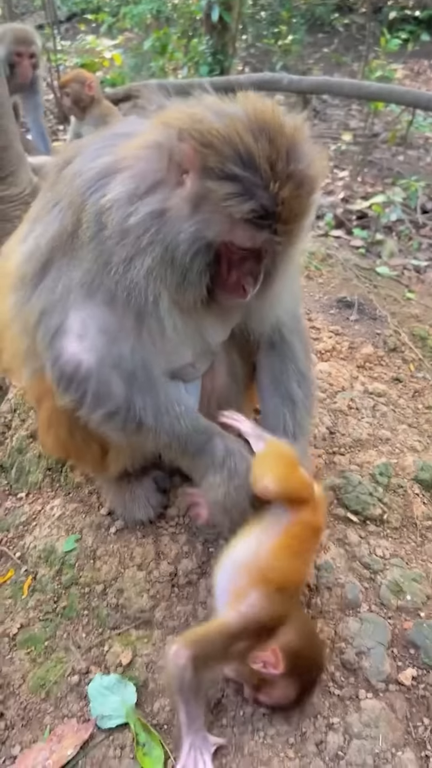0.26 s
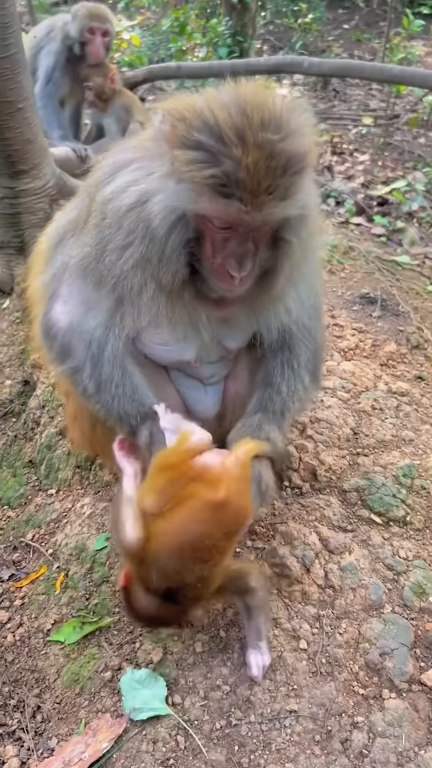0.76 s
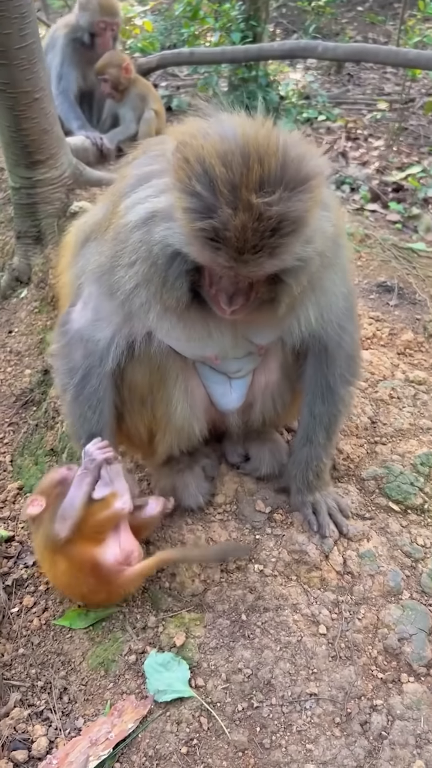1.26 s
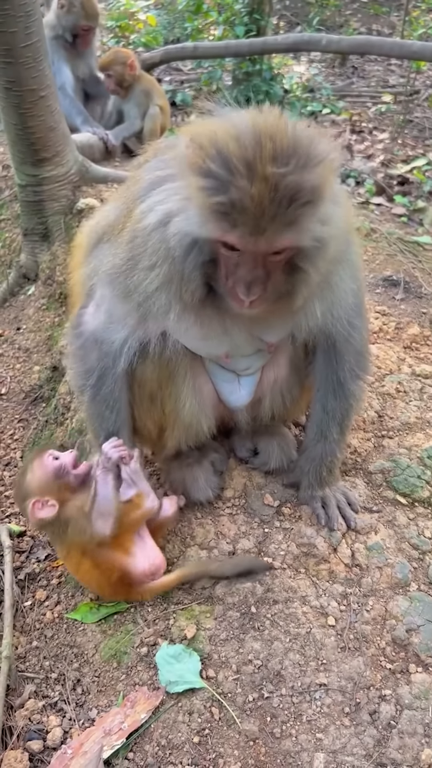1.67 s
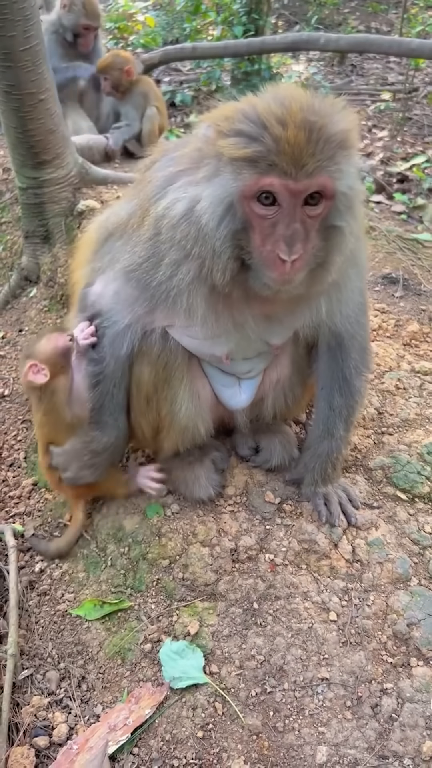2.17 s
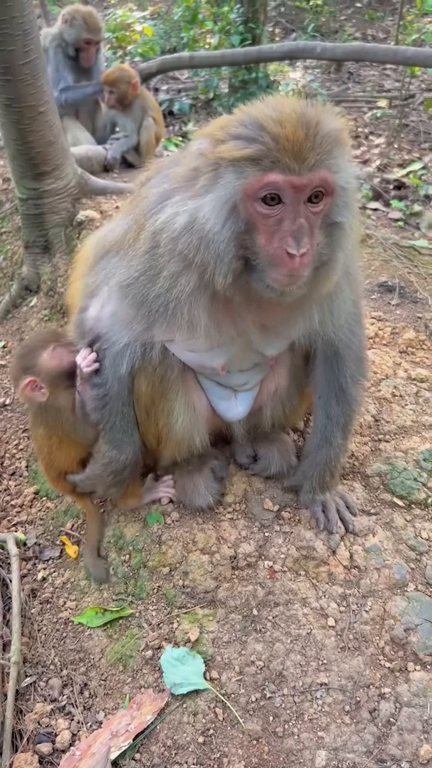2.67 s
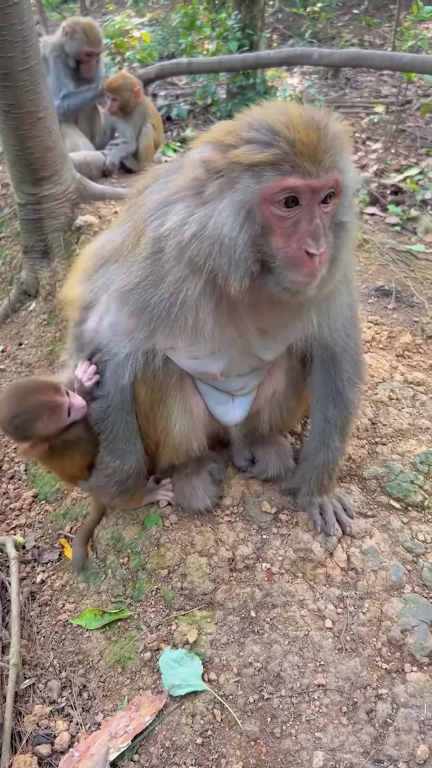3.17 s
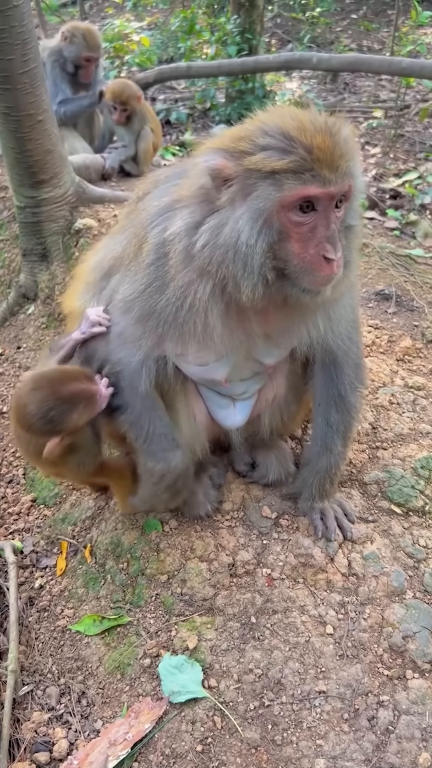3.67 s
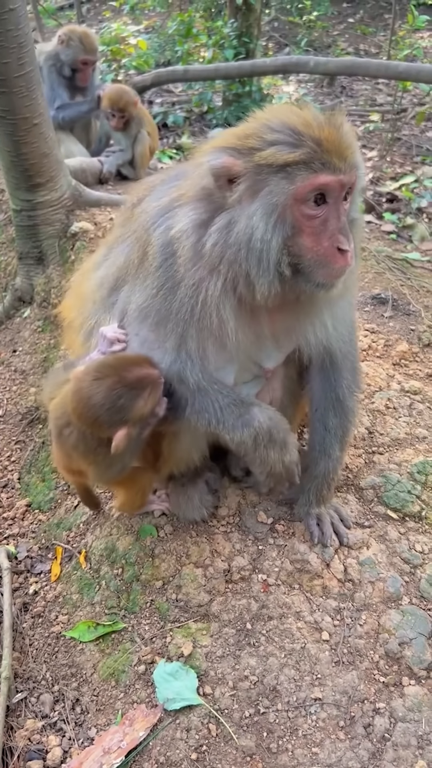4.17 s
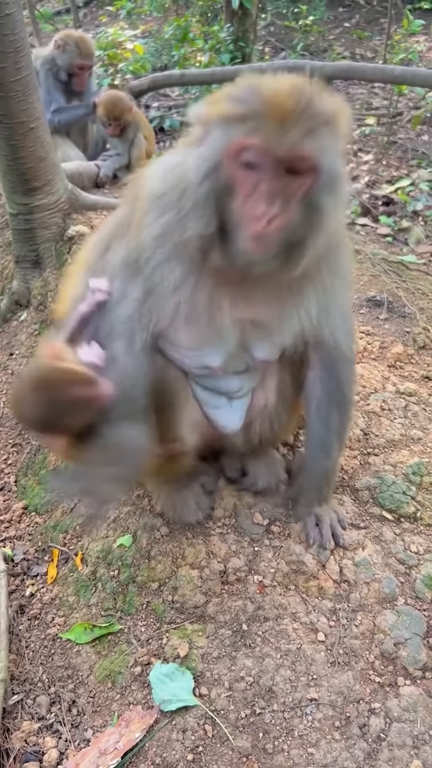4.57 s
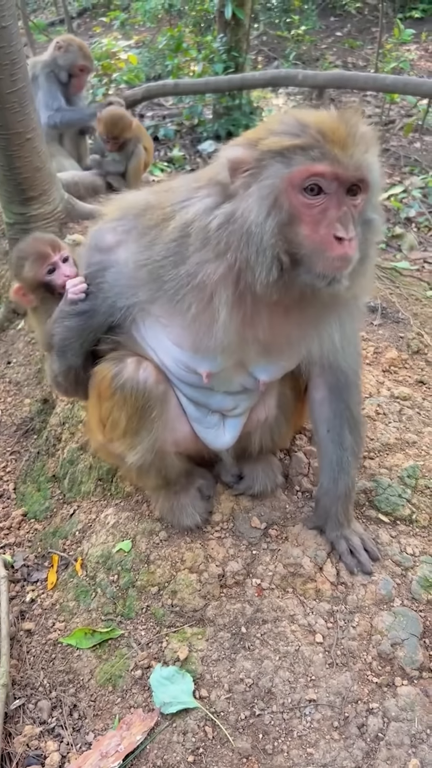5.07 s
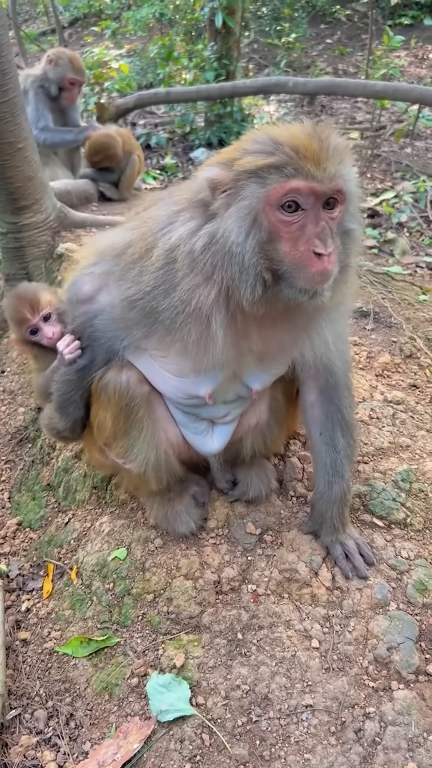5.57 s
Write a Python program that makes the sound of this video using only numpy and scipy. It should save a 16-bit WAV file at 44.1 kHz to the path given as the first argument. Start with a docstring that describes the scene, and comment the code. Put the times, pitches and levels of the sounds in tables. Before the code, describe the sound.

Close outdoor pickup of an infant monkey under trees. A thin wavering scream opens, overlapped by an older monkey's gruff, rapid chatter to one side. About eight short, harsh squeals follow until two seconds, mostly ending in a tiny low grunt. Then it is much quieter: small grunts, lip smacks, fur rustle, a few whimpers and one falling squeak over low rumble and soft woodland wash.

```python
"""A long, wavering scream opens the scene, soon joined by the gruff chatter of an older monkey off to one side.
A baby macaque, tumbled about by its mother on bare ground under trees, then gives a run of short squeals:
a whistle of the vocal folds, a break of the voice into rougher tones, and mostly a tiny low grunt of pulses.
Once it clings to her, resonant grunts, whimpers, lip smacks, fur rustle and one squeak remain over filtered-noise
rumble and wash, with a far chirr and faint high notes; ground and wood answer with decaying-noise echoes."""
import sys
import numpy as np
from scipy import signal
from scipy.fft import rfft, irfft, next_fast_len
from scipy.io import wavfile
from scipy.ndimage import uniform_filter1d

SR = 44100
rng = np.random.default_rng(int(sys.argv[2]) if len(sys.argv) > 2 else 0)


def wav_record(signal):
    """Record a signal, one row per channel, as 16-bit PCM in the file named by sys.argv[1]."""
    frames = np.transpose(np.atleast_2d(signal))
    bounded = np.clip(frames, -1, 1)
    # unit amplitude maps onto the largest positive 16-bit level
    quanta = np.round(bounded * 32767).astype(np.int16)
    wavfile.write(sys.argv[1], SR, quanta)


N = 256662
TIME = np.arange(N) / SR   # s

# In the column lists, "rel." marks a level that a further gain or balance acts on.
# spectrum of the distant rumble: f/Hz, rel. level/dB
RUMBLE = [(15, -48), (24, -35.5), (33, -18.5), (45, -1), (70, 3), (86, 2), (109, -2), (167, -3.5),
          (260, -8.5), (350, -22), (600, -32.5), (1200, -120)]
# course of the rumble: t/s, rel. level/dB
RUMBLE_LEVEL = [(0.0, -68), (0.44, -63.5), (0.63, -68), (1.69, -68), (1.78, -67), (3.24, -62.5),
                (3.42, -64), (4.03, -73.5), (4.25, -63), (4.54, -61.5), (4.7, -62), (5.24, -60),
                (5.72, -60.5), (5.82, -62)]
# spectrum of the wash of the wood: f/Hz, rel. level/dB
WASH = [(150, -24.5), (250, -8), (570, -9), (850, -10.5), (1300, -13.5), (2900, -23), (4500, -24),
        (6900, -28.5), (9500, -38.5), (12000, -48), (15600, -69)]
# course of the wash: t/s, rel. level/dB
WASH_LEVEL = [(0.0, -70), (0.42, -69.5), (0.61, -73), (1.1, -76), (3.18, -71), (3.4, -72.5), (4.0, -75.5),
              (4.73, -71), (5.14, -73.5), (5.82, -72.5)]
# left-right likeness of diffuse sound: f/Hz, correlation/1
LIKENESS = [(40, 0.95), (120, 1), (250, 0.68), (500, 0.41), (1000, 0.31), (8000, 0.26)]
# colour of the echo from the trees: f/Hz, rel. level/dB
WOOD_COLOUR = [(200, 20), (600, 0.5), (1400, -10), (3000, -6.5), (5000, 1.5), (8000, 0.5), (11000, -10.5),
               (16000, -4)]
# faint, blurred high notes: a lingering one after the last squeak, then a short bird-like chirp:
# t/s, length/s, f/Hz, level/dB
FAINT_NOTES = [(4.889, 0.14, 4620, -81), (5.504, 0.032, 4560, -79)]
# a far, shrill chirr among the trees: it swells, holds while its pitch sinks, and fades
CHIRR_START_S, CHIRR_HOLD_S, CHIRR_ATTACK_S, CHIRR_RELEASE_S = 4.17, 0.45, 0.089, 0.14
CHIRR_DB, CHIRR_HZ, CHIRR_SAG_HZ_PER_S = -66, 3900, 1000
# spectrum of fur friction: f/Hz, rel. level/dB
RUSTLE_COLOUR = [(400, -9), (950, 0), (1600, -4), (3000, -4.5), (5500, -3), (8500, 0), (11500, -9.5),
                 (15500, -18)]
# fur rubbing on fur as the infant shifts its grip: t/s, length/s, rel. level/dB
RUBS = [(1.82, 0.073, -67), (2.402, 0.052, -71), (2.817, 0.35, -64.5), (3.15, 0.33, -75.5),
        (3.626, 1, -79.5), (4.417, 0.54, -73.5)]
RUB_ATTACK_S, RUB_RELEASE_S, FUR_REST_DB = 0.067, 0.08, -96
# chatter of the older monkey: t/s, length/s before the release, rel. level/dB
CHATTER = [(0.145, 0.014, -44), (0.166, 0.0091, -50.5), (0.258, 0.032, -60), (0.295, 0.013, -49.5),
           (0.321, 0.0072, -43.5), (0.33, 0.013, -57), (0.359, 0.0095, -48), (0.3806, 0.0077, -43),
           (0.395, .012, -55.5), (0.439, 0.0066, -63), (0.45, 0.0045, -65.5)]
CHATTER_RELEASE_S = 0.0068   # each burst takes this much longer to die
# its throat resonances: rel. f/Hz, width/Hz, rel. level/dB
BIG_THROAT = [(330, 240, -2), (545, 100, 7), (860, 220, 3.5), (1132, 140, 11), (1334, 120, -1),
              (2870, 600, -10.5)]
# phase lead of the left microphone port for the older monkey: f/Hz, phase/rad
ASIDE_PHASE = [(100, -2.5), (350, -2.5), (1100, -2), (3000, -2.5)]
# level excess of the left port for it: f/Hz, level/dB
ASIDE_BALANCE = [(500, -1.5), (850, 1), (1150, 5), (1600, -0.5), (2800, -0.5)]
# soft scuffs, low thumps and a flick of fur: t/s, level/dB, centre f/Hz
SCUFFS_AND_THUMPS = [(0.293, -73, 7230), (0.463, -59, 230), (0.475, -69.5, 6060), (0.611, -67, 1300),
                     (0.618, -59.5, 267), (1.79, -63.5, 7000), (1.845, -60.5, 9000), (2.478, -69, 1840),
                     (2.836, -53, 8650), (3.048, -62, 10100), (3.475, -70.5, 897), (4.429, -61, 1746),
                     (4.751, -71, 5460), (4.782, -67, 890), (4.862, -68, 1198)]
# lip smacks: t/s, rel. level/dB, mouth resonance f/Hz, rel. treble level/dB
SMACKS = [(2.207, -62.5, 1320, 8.5), (2.3636, -42.5, 1580, -19), (2.52, -51.5, 1400, -25),
          (2.607, -48.5, 1510, -14), (2.616, -42, 1520, -6.5), (3.0717, -47, 1600, -34),
          (3.3332, -42.5, 1524, 2.5), (3.5754, -54, 1560, -30), (3.7435, -53.5, 1554, -38.5),
          (3.7539, -53.5, 1490, -14.5), (3.823, -48.5, 1520, -23), (4.448, -48, 1790, -10),
          (4.828, -67, 1500, -3), (5.4104, -43, 1556, -16.5)]
# modes of the small mouth: multiple of its resonance/1, rel. level/dB, t60/s
MOUTH = [(1, -2, 0.024), (1.45, -3, 0.005), (1.999, -18, 0.011), (2.85, -6, 0.0012)]
# spectrum of the tick of parting lips: f/Hz, rel. level/dB
TICK = [(250, -31.5), (800, 0.5), (2000, 0), (4500, 6), (7000, 13), (10000, 2), (15000, -26)]
# phase lead of the left port for the infant: f/Hz, phase/rad
PORT_PHASE = [(60, 0), (4740, -0.41), (5430, -1.1), (14900, -1.4), (16000, 0.2)]
# level excess of the left port for the infant: f/Hz, level/dB
PORT_BALANCE = [(60, -3.5), (240, -3.5), (950, -1.5), (3770, 0.5), (15000, 0)]
# low grunts: t/s, length/s, initial f/Hz, rel. voiced level/dB, mouth resonance f/Hz,
# rel. resonance level/dB, rel. rasp level/dB
GRUNTS = [ (0.555, 0.019, 871, -53.5, 2720, -45, -48.5), (0.829, .027, 604, -48, 2920, -50.5, -58.5),
          (1.041, 0.02, 794, -55.5, 2840, -59.5, -64.5), (1.253, 0.034, 920, -49.5, 3270, -51, -57),
          (1.487, 0.031, 663, -50.5, 2530, -53, -58), (1.703, 0.012, 716, -53.5, 2900, -48, -48),
          (1.801, 0.014, 601, -56, 2200, -67.5, -65), (2.022, 0.025, 522, -56, 2300, -65.5, -59),
          (2.218, 0.029, 481, -54.5, 1350, -64.5, -56.5), (2.432, 0.02, 426, -62.5, 1576, -60, -66),
          (2.649, 0.031, 453.5, -59.5, 1404, -62, -62), (2.9245, 0.026, 438, -53, 1320, -52.5, -61.5),
          (3.132, 0.021, 470, -53.5, 1390, -51, -56.5), (3.641, 0.011, 490, -61, 2850, -69, -71.5),
          (3.902, 0.021, 481, -70.5, 1200, -59, -74), (4.472, 0.023, 529, -58.5, 1790, -60, -54.5),
          (4.878, 0.012, 490, -60, 1334, -67.5, -67.5), ]
GRUNT_ATTACK_S, REST_HZ, RELAX_S = 0.00061, 385, 0.02   # the pitch sags towards that of slack folds
OPEN_ATTACK_S, CLINGS_S = 0.029, 2.1   # until the infant clings, its open-mouthed grunts swell more slowly
# rasp of an open-mouthed grunt: f/Hz, rel. level/dB
RASP = [(1500, -6), (3000, -10), (4700, -10.5), (6400, 1.5), (8500, -12), (12000, -14.5), (16000, -21.5)]
# thin hiss of a grunt or whimper with the mouth nearly shut: f/Hz, rel. level/dB
HISS = [(1500, -9.5), (3000, -10), (4700, -10), (6400, 3), (8500, -8.5), (12000, -13), (16000, -22)]
HISS_RISE_S, HISS_OUTLASTS_S = 0.0089, 0.018   # the hiss outlasts a grunt only
# thin, higher whimpers: t/s, initial f/Hz, mouth resonance f/Hz, resonance level/dB, hiss level/dB
WHIMPERS = [(4.107, 1060, 2080, -63.5, -74), (4.179, 1080, 2024, -67, -63.5),
            (4.653, 1123, 2260, -59.5, -59), (5.109, 1015, 944, -58.5, -55.5)]
WHIMPER_S, WHIMPER_ATTACK_S, WHIMPER_SAG_HZ, WHIMPER_LOW_DB = 0.042, 0.005, 180, -94
WHIMPER_Q = 5   # sharpness of the mouth resonance
# the opening scream: t/s, f/Hz, then rel. level/dB of the fundamental, the second harmonic and
# the half-harmonic between them, roughness/1
SCREAM = [(0.0, 6480, -35.5, -48, -51, 0.2), (0.008, 5610, -39.5, -33.5, -55.5, 0.1),
          (0.014, 5620, -35, -27, -55, 0.04), (0.021, 5730, -42.5, -33.5, -48.5, 0.04),
          (0.029, 6050, -41, -41.5, -49, .08), (0.038, 6510, -32.5, -52.5, -43, .03),
          (0.048, 6750, -40, -43.5, -41.5, 0.02), (0.075, 6950, -41.5, -49, -42, 0.03),
          (0.09, 6980, -43, -46.5, -53.5, 0.1), (0.113, 6770, -42.5, -46.5, -65.5, 0.04),
          (0.127, 6590, -38, -47, -60.5, 0.025), (0.139, 6800, -38, -45.5, -60, 0.04),
          (0.153, 6850, -44, -44, -41.5, .13), (0.165, 7200, -44, -44, -53, .16),
          (0.174, 7460, -40.5, -46.5, -55, .12), (0.184, 7000, -44, -37, -46.5, .06),
          (0.2, 6900, -41, -47, -64, 0.025), (0.213, 6580, -40, -53, -66.5, 0.015),
          (0.227, 6730, -36.5, -49, -63.5, 0.02), (0.239, 6580, -35.5, -52, -52.5, 0.1)]
SCREAM_GAIN_DB = 0.5
# whistles that open the squeals: t/s, roughness at onset/1, length/s, f/Hz, glide/octaves, rel. level/dB,
# second harmonic re the first/dB, roughness/1
WHISTLES = [ (0.314, 1, 0.019, 6450, 0.043, -35.5, -0.5, 0.58),
            (0.5324, 0.1, 0.0108, 8940, -.2, -21.5, -28, 0.04),
            (0.7984, 0.7, 0.011, 8080, -0.14, -33.5, -14, 0),
            (1.0095, 0.07, 0.0032, 6520, -0.055, -31.5, -20.5, 0.11),
            (1.2131, 0.5, 0.018, 6025, -0.1, -33, -10, 0.11),
            (1.4404, 0.3, .0085, 5920, 0.1, -27, -6, 0.06),
            (1.6791, 0.7, 0.008, 6770, 0.016, -31.5, -9.5, 0.35),
            (1.9574, 0.3, 0.012, 6030, 0.013, -32.5, -9, 0.09), ]
WHISTLE_BEND = 7   # a whistle holds its pitch, then hooks away
CATCH_S = 0.0018   # the folds are rough for an instant before they lock
WHISTLE_ARCH_DB = 2   # a whistle's ends lie this far under its middle
# breaks of the voice, some split into strands by a slower flap: t/s, length/s, f/Hz, glide/octaves,
# rel. level/dB, fade/dB, second harmonic re the first/dB, roughness/1, flap f/Hz, flap depth/1
BREAKS = [ (0.243, 0.019, 5760, -0.57, -46.5, 4.5, -2, 0.12, 1900, 0.25),
          (0.3314, 0.006, 8000, -0.32, -25, 9, -12, 0.42, 1295, 0.8),
          (0.339, .016, 5480, -0.63, -38.5, 8, -3, 0.7, 890, .4),
          (0.5318, 0.002, 6020, -.05, -32.5, 3, -19.5, .3, 1900, 0.4),
          (0.536, 0.007, 4760, -.05, -42.5, 0, -20, .4, 900, 0.2),
          (0.5425, .023, 4730, -.2, -30.5, 6.5, -16.5, 0.6, 1301, 0.4),
          (0.7957, 0.0041, 4920, -0.26, -39, 6.5, -10, 0.1, 893, 0.25),
          (0.8102, 0.0048, 4300, -0.16, -46.5, -2, -10, 0.4, 894, 0.7),
          (0.8122, 0.011, 7470, -0.14, -35, 5.5, -8, 0.12, 800, 0.2),
          (0.817, 0.017, 4180, -0.1, -34.5, 7, -7.5, 0.3, 670, 0.4),
          (1.0126, 0.022, 5055, -0.003, -41.5, -5, -14, 0.16, 803, 0.72),
          (1.2333, 0.011, 5160, -0.083, -28.5, 9, -5.5, 0.06, 1530, 0.06),
          (1.454, 0.013, 6535, -.17, -27.5, 8.5, -12.5, 0.2, 1195, 0.3),
          (1.682, 0.008, 5760, 0.039, -28, 1, -8, 0.23, 919, 0.6),
          (1.689, 0.006, 7500, -0.093, -34, -3.5, -8.5, 0.4, 900, .2),
          (1.697, 0.0065, 6960, -0.29, -20.5, 15.5, -25.5, 0, 910, 0.1),
          (1.969, 0.01, 5870, -0.21, -28, 8.5, -17.5, 0.51, 1025, 0.21),
          (1.979, 0.009, 7370, -0.038, -34.5, 2.5, -14, 0.5, 1380, 0), ]
BREAK_SWELL_DB, BREAK_SWELL_S = 4.5, .0025   # a break starts this far down and swells this fast
FLAP_ABOVE = 0.77   # strength of the flap's upper side lines re the lower one
HALF_CLEAN_DB, HALF_ROUGH_DB = -32, -2.5   # half-harmonics of a clean and of a fully rough voice
# weak falling squeaks: t/s, length/s, f/Hz, glide/octaves, rel. level/dB
SQUEAKS = [(0.569, 0.007, 2350, -.15, -51.5), (2.007, 0.019, 3300, -0.54, -51.5),
           (4.832, 0.024, 3765, -0.83, -46.5)]
SQUEAK_CATCH, SQUEAK_SECOND_DB, SQUEAK_ROUGH = 0.56, -8.5, 0.036
# resonances of the infant's tight throat and mouth: f/Hz, rel. level/dB
THROAT = [(1500, -3), (2300, 6), (3300, -5.5), (4500, 2), (5500, -1.5), (7200, 1), (8100, 1.5),
          (8800, -1.5), (9900, 3.5), (11500, 0), (15000, -1.5)]
# air torn by its folds: f/Hz, rel. level/dB
THROAT_HISS = [(1800, -27.5), (3600, -9.5), (4600, -4), (7200, -7), (9500, -14.5), (12500, -5),
               (15000, -11.5)]
CUTOFF_HZ = 16100


def from_db(db):
    """Logarithmic level: 20 dB is a factor of ten in amplitude."""
    return 10 ** (np.asarray(db) / 20)


def rms_one(x):
    """Power normalisation: divide by the root mean square."""
    return x / np.sqrt(np.mean(x ** 2) + 1e-20)


def columns_at(rows, t):
    """Linear interpolation: each column of a curve table at the times t."""
    s, *columns = np.transpose(rows)
    return [np.interp(t, s, c) for c in columns]


def at_hz(points, hz):
    """Interpolation of a spectrum on a log-frequency axis."""
    f, value = np.transpose(points)
    return np.interp(np.log(hz + 1), np.log(f), value)


def coloured(x, spectrum):
    """Spectral filtering: weight each frequency, then scale to rms 1."""
    size = x.shape[-1]
    padded = next_fast_len(size)
    gain = from_db(at_hz(spectrum, np.fft.rfftfreq(padded, 1 / SR)))
    return rms_one(irfft(rfft(x, padded) * gain, padded)[..., :size])


def wobble(size, rate_hz):
    """Low-passed noise: smooth random motion up to about rate_hz, rms 1."""
    r = np.exp(-2 * np.pi * rate_hz / SR)
    noise = rng.standard_normal(size + SR // 8)
    return rms_one(signal.lfilter([1], [1, -2 * r, r * r], noise)[-size:])


def flutter(size, width_hz):
    """Narrow-band noise as a complex envelope: random amplitude and phase within width_hz, rms 1."""
    lowpass = signal.butter(4, width_hz, fs=SR, output="sos")
    real, imag = signal.sosfilt(lowpass, rng.standard_normal((2, size + 500)))[:, -size:]
    return rms_one(real) / np.sqrt(2) + 1j * rms_one(imag) / np.sqrt(2)


def resonate(x, hz, width_hz):
    """Damped resonance: a two-pole filter with gain 1 on top."""
    r = np.exp(-np.pi * width_hz / SR)
    poles = [1, -2 * r * np.cos(2 * np.pi * hz / SR), r * r]
    return signal.lfilter(np.array([1, 0, -1]) * (1 - r * r) / 2, poles, x)


def swell(t, length, rise):
    """Envelope of a puff: a linear rise and a rounded fall to silence at the end of length, rms 1."""
    return rms_one(np.clip(t / rise, 0, 1) * np.cos(np.pi / 2 * np.clip(t / length, 0, 1)))


def held(start, length, attack, release):
    """Exponential growth up to start, a hold for length, then exponential decay."""
    return np.exp(np.minimum(TIME - start, 0) / attack - np.maximum(TIME - start - length, 0) / release)


def add(track, start, sound):
    """Superposition: mix a sound into a track at start seconds."""
    i = max(round(start * SR), 0)
    track[i:i + len(sound)] += sound[:N - i]


def stereo_noise(spectrum):
    """Diffuse field: correlation between the channels falls from bass to treble."""
    mid, side = rfft(rng.standard_normal((2, next_fast_len(N, True))))
    alike = np.clip(at_hz(LIKENESS, np.linspace(0, SR / 2, len(mid))), -1, 1)
    pair = irfft(np.sqrt(1 + alike) * mid + np.sqrt(1 - alike) * side * [[1], [-1]])
    return coloured(pair[:, :N], spectrum)


def scatter(x, t60, delay, colour):
    """Reverberation: dense, decaying reflections, different in each channel; unit energy."""
    t = np.arange(SR) / SR
    onset = np.clip(t / delay - 1, 0, 1)   # silent until delay
    tail = coloured(rng.standard_normal((2, SR)), colour) * from_db(-60 * t / t60) * onset
    tail = tail / np.sqrt(np.sum(tail ** 2, axis=1, keepdims=True))
    return signal.fftconvolve(x[None], tail, axes=1)[:, :N]


def at_ports(x, phase, balance):
    """Directional pickup: sound reaches two microphone ports with differences of phase and level."""
    size = next_fast_len(N + 2048, True)
    hz = np.fft.rfftfreq(size, 1 / SR)
    lead = from_db(at_hz(balance, hz) / 2) * np.exp(.5j * at_hz(phase, hz))
    return irfft(rfft(x, size) * np.array([lead, 1 / lead]), size)[:, :N]


def background(rumble_db=2.5, air_db=2.5, swell_db=1.5):
    """Diffuse filtered noise: a far rumble, swelling at random, and the soft wash of the wood."""
    low_db, = columns_at(RUMBLE_LEVEL, TIME)
    wash_db, = columns_at(WASH_LEVEL, TIME)
    rumble = from_db(low_db + rumble_db + swell_db * wobble(N, 5)) * stereo_noise(RUMBLE)
    wash = from_db(wash_db + air_db) * stereo_noise(WASH)
    return rumble + wash


def faint_notes(blur_hz=70, rise=0.013):
    """Line broadening: random amplitude and phase blur each faint high tone into a narrow band."""
    out = np.zeros(N)
    for start, length, hz, level_db in FAINT_NOTES:
        t = np.arange(0, length, 1 / SR)
        note = (flutter(len(t), blur_hz) * np.exp(2j * np.pi * hz * t)).real
        add(out, start, from_db(level_db) * rms_one(note * swell(t, length, rise)))
    return out


def chirr(width_hz=950):
    """Modulated carrier: noise envelopes, half shared by the channels, spread a sinking tone into a band."""
    hz = CHIRR_HZ - CHIRR_SAG_HZ_PER_S * np.clip(TIME - CHIRR_START_S, 0, CHIRR_HOLD_S)
    level = from_db(CHIRR_DB) * held(CHIRR_START_S, CHIRR_HOLD_S, CHIRR_ATTACK_S, CHIRR_RELEASE_S)
    carrier = np.exp(2j * np.pi * np.cumsum(hz) / SR)
    shared = flutter(N, width_hz)
    return level * np.array([((shared + flutter(N, width_hz)) * carrier).real for _ in range(2)])


def rustle(stroke_db=2.0):
    """Friction noise: hairs slide over each other in uneven strokes."""
    rubs = [from_db(level_db) * held(start, length, RUB_ATTACK_S, RUB_RELEASE_S)
            for start, length, level_db in RUBS]
    effort = from_db(FUR_REST_DB) + np.max(rubs, axis=0)
    return effort * from_db(stroke_db * wobble(N, 14)) * stereo_noise(RUSTLE_COLOUR)


def chatter(pulse_hz=190, gain_db=4.0, ragged_db=6.5, tail_db=-15, tail_s=0.036, throat_shift=0.084):
    """Source and filter: uneven pulses of air excite a larger throat, shaped a little differently each time."""
    out = np.zeros(N)
    t = np.arange(SR // 16) / SR
    for start, length, level_db in CHATTER:
        phase = 2 * np.pi * np.cumsum(pulse_hz * (1 + .3 * wobble(len(t), 100))) / SR
        full_length = length + CHATTER_RELEASE_S
        burst = swell(t, full_length, 0.001)
        effort = burst / burst.max() + from_db(tail_db) * np.exp(-t / tail_s)
        effort = effort * from_db(ragged_db * wobble(len(t), 120))
        source = rng.standard_normal(len(t)) * (1 + np.cos(phase)) * effort
        throat = 0
        for hz, width, db in BIG_THROAT:
            shifted_hz = hz * (1 + throat_shift * rng.uniform(-1, 1))
            ring = resonate(resonate(source, shifted_hz, width), shifted_hz, 3 * width)
            throat = throat + from_db(db) * ring
        # energy grows with the length of the burst
        add(out, start, from_db(level_db + gain_db) * rms_one(throat) * np.sqrt(full_length / t[-1]))
    return out


def scuffs_and_thumps(length=.012, gain_db=0.0):
    """Resonance-filtered noise: each is a brief puff of noise around its own centre frequency."""
    out, t = np.zeros(N), np.arange(0, length, 1 / SR)
    for start, level_db, hz in SCUFFS_AND_THUMPS:
        puff = resonate(rng.standard_normal(len(t)), hz, 0.53 * hz)
        add(out, start, from_db(level_db + gain_db) * rms_one(puff * swell(t, length, 0.0036) ** 2))
    return out


def lip_smacks(ring_db=0.0, tick_db=11.0, tick_decay=0.0012):
    """Free decay of modes: wet lips part with a tick, and the mouth rings for a moment."""
    out, t = np.zeros(N), np.arange(SR // 25) / SR
    for start, peak_db, hz, treble_db in SMACKS:
        ring = sum(from_db(db - 60 * t / t60) * np.sin(2 * np.pi * hz * k * t) for k, db, t60 in MOUTH)
        tick = coloured(rng.standard_normal(len(t)), TICK) * np.exp(-t / tick_decay)
        add(out, start, from_db(peak_db) * (from_db(ring_db) * ring + from_db(treble_db + tick_db) * tick))
    return out


def rasp(length, rise, level_db, spectrum):
    """Turbulence: air forced through the mouth along with a call."""
    t = np.arange(0, length, 1 / SR)
    return from_db(level_db) * coloured(rng.standard_normal(len(t)), spectrum) * swell(t, length, rise)


def grunt(length, attack, first_hz, last_hz, low_db, mouth_hz, mouth_db, mouth_q=1.9,
          octave_db=-8, third_db=-16, lag=0.0015, fade=0.02):
    """Pulse excitation: slow, falling glottal pulses ring the mouth on every cycle."""
    t = np.arange(0, length, 1 / SR)
    hz = np.interp(t, [0, length], [first_hz, last_hz]) * (1 + .035 * wobble(len(t), 300))
    phase = 2 * np.pi * np.cumsum(hz) / SR
    pulses = np.diff(np.floor(phase / (2 * np.pi)), prepend=-1)   # one per cycle
    pulses = pulses * (1 + .7 * wobble(len(t), 380))
    source = rms_one(pulses) + .4 * rng.standard_normal(len(t))
    mouth = resonate(resonate(source, mouth_hz, mouth_hz / mouth_q), mouth_hz, 2 * mouth_hz / mouth_q)
    # a low mouth resonance also lifts the first overtones
    overtones = from_db(octave_db) * np.sin(2 * phase) + from_db(third_db) * np.sin(3 * phase)
    voiced = rms_one(np.sin(phase) + (1700 / mouth_hz) ** 2 * overtones)
    body = from_db(low_db) * voiced * swell(t, length, attack + lag)
    # the mouth rings early and the fundamental outlasts it
    return body + from_db(mouth_db) * rms_one(mouth * swell(t, length, attack) * np.exp(-t / fade))


def glide(start, length, hz, octaves, level_db, second_db, rough, bend=1):
    """Logarithmic glide; a bend over 1 hooks it at the end. Columns: t/s, f/Hz, level/dB,
    second harmonic/dB, half-harmonics/dB, roughness/1."""
    along = np.linspace(0, 1, len(level_db))
    half_db = HALF_CLEAN_DB + (HALF_ROUGH_DB - HALF_CLEAN_DB) * rough
    pitch = hz * 2 ** (octaves * along ** bend)
    course = (start + length * along, pitch, level_db, second_db, half_db, rough)
    return np.column_stack(np.broadcast_arrays(*course))


def whistle(start, catch_rough, length, hz, octaves, level_db, second_db, rough, bend=1):
    """Locking of an oscillator: the folds catch, lock into a tone, swell and ease off."""
    along = np.linspace(0, 1, 20)
    catch = catch_rough * np.exp(-(along * length / CATCH_S) ** 2)
    arched_db = level_db - WHISTLE_ARCH_DB * (2 * along - 1) ** 2
    return glide(start, length, hz, octaves, arched_db, second_db, np.maximum(rough, catch), bend)


def broken(start, length, hz, octaves, level_db, fade_db, second_db, rough):
    """Register jump: the voice breaks to another pitch and swells quickly; fade_db shapes its end."""
    along = np.linspace(0, 1, 20)
    drop_db = BREAK_SWELL_DB * np.exp(-along * length / BREAK_SWELL_S) + fade_db * along ** 2
    return glide(start, length, hz, octaves, level_db - drop_db, second_db, rough)


def scream():
    """Sum of partial powers: the course of a long wavering whistle with varying overtones."""
    s, hz, first_db, second_db, half_db, rough = np.transpose(SCREAM)
    power = from_db(first_db) ** 2 + from_db(second_db) ** 2 + from_db(half_db) ** 2
    level_db = 10 * np.log10(power) + SCREAM_GAIN_DB
    return np.column_stack([s, hz, level_db, second_db - first_db, half_db - first_db, rough])


def high_calls():
    """Fold oscillation in whistles, breaks and squeaks: yields course, flap f/Hz, flap depth/1."""
    for row in WHISTLES:
        yield whistle(*row, bend=WHISTLE_BEND), 0, 0
    for *row, flap_hz, flap_depth in BREAKS:
        yield broken(*row), flap_hz, flap_depth
    for start, length, hz, octaves, level_db in SQUEAKS:
        course = whistle(start, SQUEAK_CATCH, length, hz, octaves, level_db, SQUEAK_SECOND_DB, SQUEAK_ROUGH)
        yield course, 0, 0


def squeal(rows, flap_hz=0, flap_depth=0, jitter=0.031, jitter_hz=300, chaos_hz=480, sub_db=-12,
           third_db=-18, quarter_db=-18, turbulence_db=-9, overtone_hiss=0.18, spread=4.2,
           flap_wander=0.1, rise=0.0007, fall=0.0016):
    """Period doubling and chaos: a whistling vibration of the folds that, when rough, smears into bands."""
    start, end = rows[0][0], rows[-1][0]
    t = np.arange(start - rise, end + 6 * fall, 1 / SR)
    hz, level_db, second_db, half_db, rough = columns_at(rows, t)
    rough = np.clip(rough, 0, 1)
    jittered_hz = hz * (1 + jitter * np.sqrt(rough) * wobble(len(t), jitter_hz))
    phase = 2 * np.pi * np.cumsum(jittered_hz) / SR
    # a second, slower vibration sets side lines round the whistle: one below it and two above
    flap = np.exp(2j * np.pi * np.cumsum(flap_hz * (1 + flap_wander * wobble(len(t), 200))) / SR)
    strands = 1 + flap_depth * (1 / flap + FLAP_ABOVE * (flap - flap ** 2))
    # alternate cycles differ, so lines appear halfway between the harmonics, and others between those
    below_db = 2 * np.minimum(half_db, 0) + sub_db
    between_db = quarter_db + 20 * np.log10(rough + 1e-3)
    lines = [(1, 0), (2, second_db), (3, second_db + third_db), (3 / 2, half_db), (1 / 2, below_db),
             (5 / 4, between_db), (7 / 4, between_db)]
    voice = 0
    for multiple, db in lines:
        # chaos smears every line into a band, the fundamental least
        chaos = rough if multiple == 1 else np.minimum(rough * spread, 1)
        width_hz = chaos_hz * np.sqrt(multiple)
        if multiple in (5 / 4, 7 / 4):   # the quarter lines are always broad bands
            chaos, width_hz = 1, 1.5 * width_hz
        line = (1 - chaos + chaos * flutter(len(t), width_hz)) / np.hypot(1 - chaos, chaos)
        tone = (line * strands * np.exp(1j * multiple * phase)).imag
        voice = voice + from_db(db) * tone * (multiple * hz < SR / 2)
    # rough, hard-pressed, bright folds tear more air
    leak = (rough + overtone_hiss) * from_db(np.minimum(second_db, 0))
    voice = voice + from_db(turbulence_db) * leak * coloured(rng.standard_normal(len(t)), THROAT_HISS)
    voice = coloured(voice, THROAT)
    # even out the short-term power, so that the course sets the level
    voice = voice / np.sqrt(uniform_filter1d(voice ** 2, size=200) + 1e-9)
    gate = np.clip((t - t[0]) / rise, 0, 1) * np.exp(-np.maximum(t - end, 0) / fall)
    # the tiny throat radiates little far below the lowest pitch of the call
    highpass = signal.butter(4, 0.2 * hz.min(), "high", fs=SR, output="sos")
    return signal.sosfilt(highpass, voice * from_db(level_db) * gate)


def baby(squeal_db=0.5, grunt_db=1.0, hiss_db=-1.0):
    """Superposition of the infant's scream, squeals, squeaks, grunts and whimpers."""
    out = np.zeros(N)
    long_call = squeal(scream(), jitter=0.014, spread=3.6, quarter_db=5, turbulence_db=-4, overtone_hiss=0.055)
    add(out, SCREAM[0][0], long_call)
    for rows, flap_hz, flap_depth in high_calls():
        add(out, rows[0][0], from_db(squeal_db) * squeal(rows, flap_hz, flap_depth))
    for start, length, hz, low_db, mouth_hz, mouth_db, rasp_db in GRUNTS:
        last_hz = REST_HZ + (hz - REST_HZ) * np.exp(-length / RELAX_S)
        if start < CLINGS_S:
            attack = OPEN_ATTACK_S
            air = rasp(length, OPEN_ATTACK_S, rasp_db, RASP)
        else:
            attack = GRUNT_ATTACK_S
            air = rasp(length + HISS_OUTLASTS_S, HISS_RISE_S, rasp_db + hiss_db, HISS)
        voice = grunt(length, attack, hz, last_hz, low_db, mouth_hz, mouth_db)
        add(out, start, from_db(grunt_db) * voice)
        add(out, start, air)
    for start, hz, mouth_hz, mouth_db, rasp_db in WHIMPERS:
        whimper = grunt(WHIMPER_S, WHIMPER_ATTACK_S, hz, hz - WHIMPER_SAG_HZ, WHIMPER_LOW_DB,
                        mouth_hz, mouth_db, mouth_q=WHIMPER_Q)
        add(out, start, whimper)
        add(out, start, rasp(WHIMPER_S, HISS_RISE_S, rasp_db, HISS))
    return out


def scene(ground_db=-12, wood_db=-25, aside_wood_db=-15, aside_ground_db=-13):
    """Direct and reflected sound: infant nearly ahead, older monkey aside; ground and bodies scatter early,
    the trees late."""
    near, aside = baby() + lip_smacks() + scuffs_and_thumps(), chatter()
    ground_colour = [(400, -4.5), (3000, -6.0), (7000, -4.0), (15000, -5.0)]   # f/Hz, rel. level/dB
    to_ground = from_db(ground_db) * near + from_db(aside_ground_db) * aside
    to_wood = from_db(wood_db) * near + from_db(aside_wood_db) * aside
    ground = scatter(to_ground, t60=0.11, delay=0.0011, colour=ground_colour)
    wood = scatter(to_wood, t60=0.57, delay=0.0027, colour=WOOD_COLOUR)
    direct = at_ports(near, PORT_PHASE, PORT_BALANCE) + at_ports(aside, ASIDE_PHASE, ASIDE_BALANCE)
    return direct + ground + wood + chirr() + faint_notes() + rustle() + background()


def record(dry):
    """Band limitation: a steep elliptic low-pass removes the top."""
    return signal.sosfilt(signal.ellip(10, .2, 80, CUTOFF_HZ, fs=SR, output="sos"), dry)


dry = scene()
out = record(dry)
wav_record(out)
```